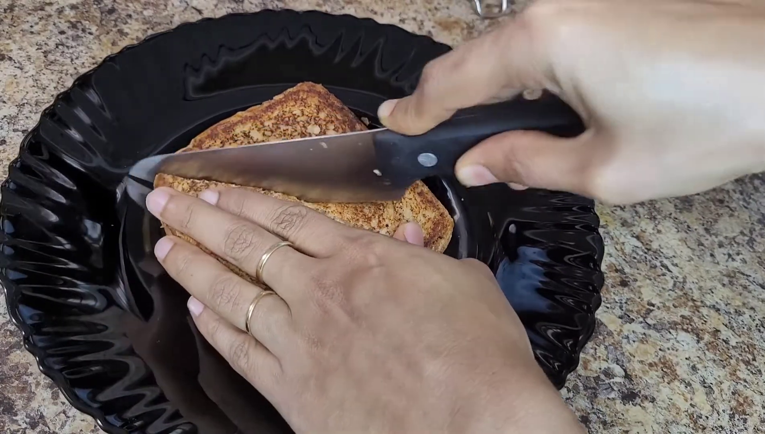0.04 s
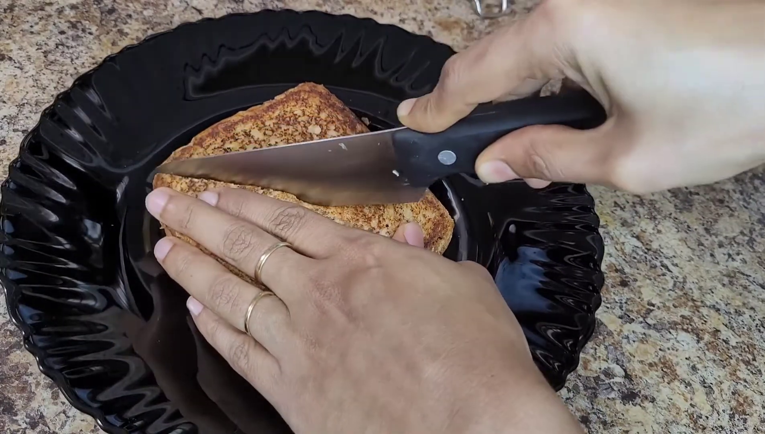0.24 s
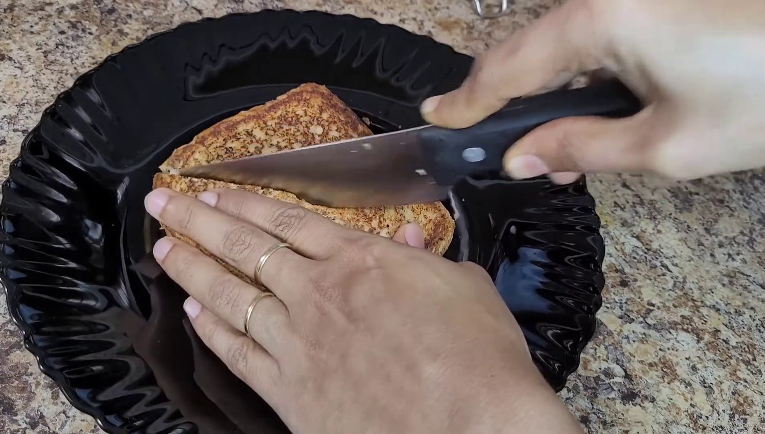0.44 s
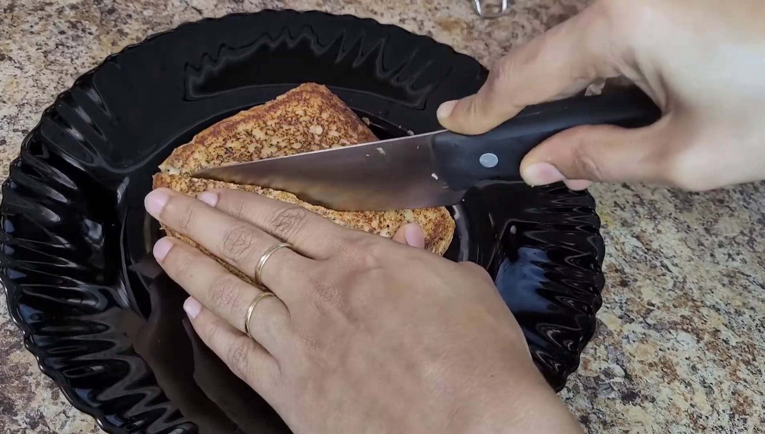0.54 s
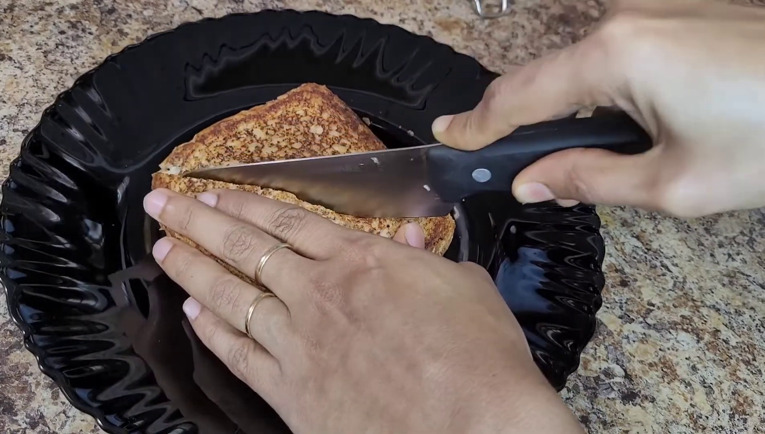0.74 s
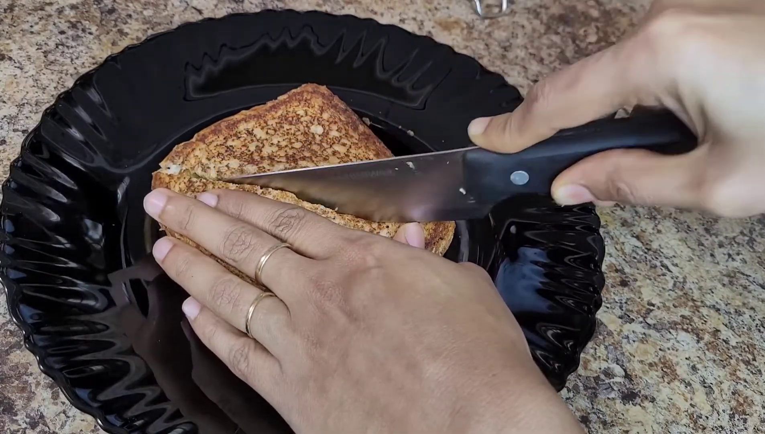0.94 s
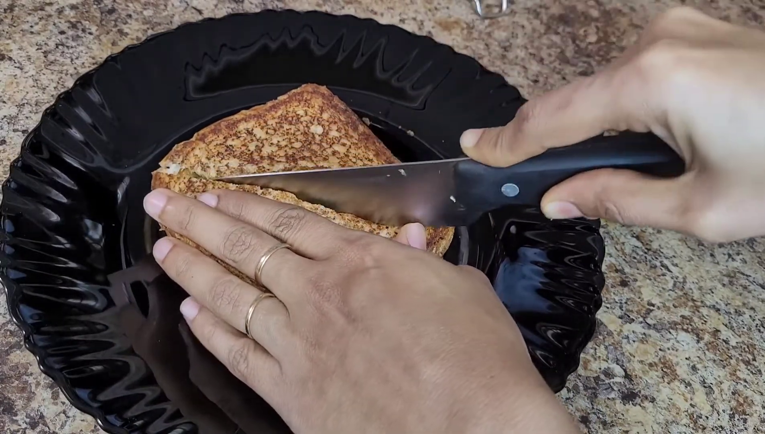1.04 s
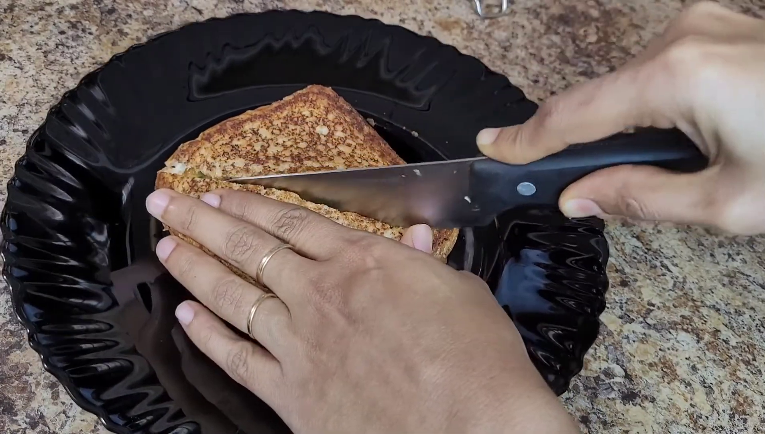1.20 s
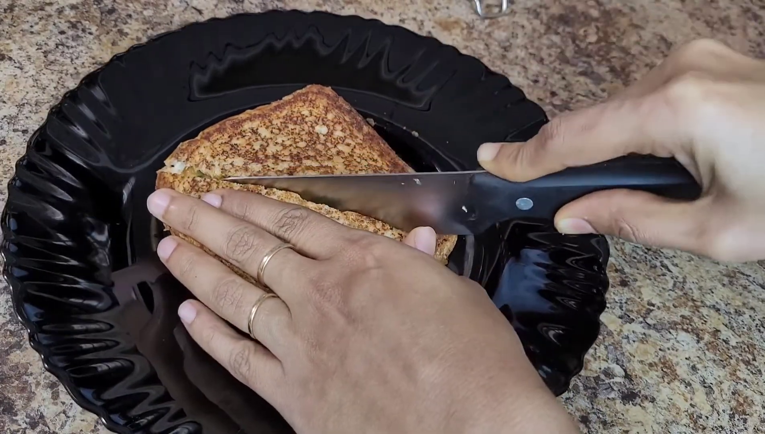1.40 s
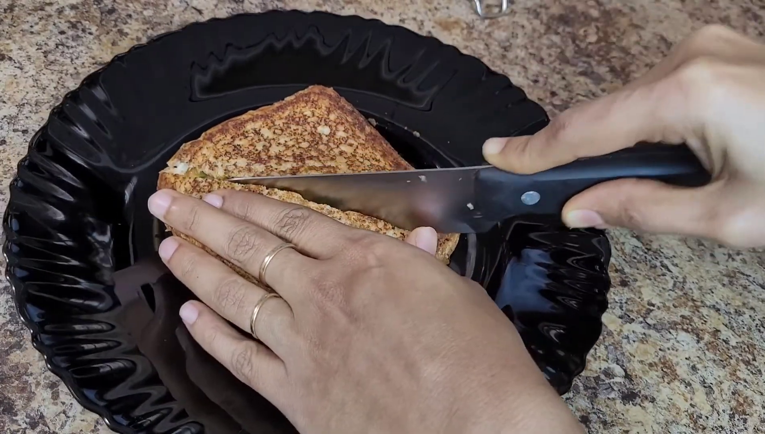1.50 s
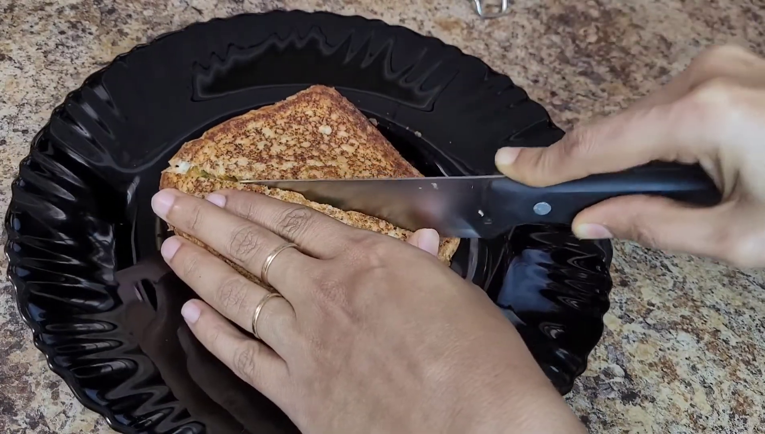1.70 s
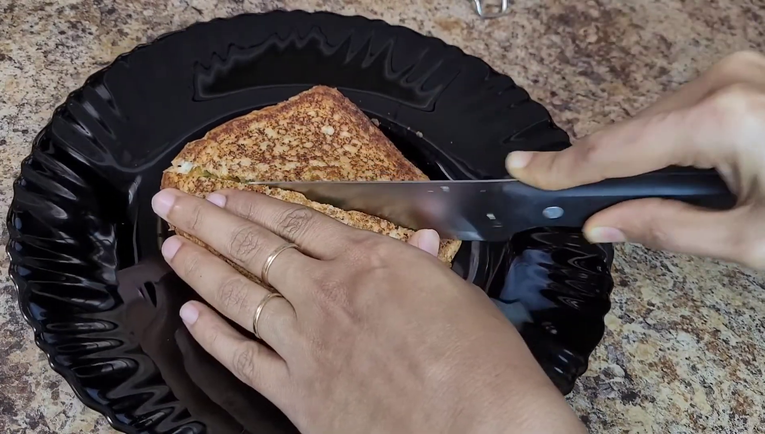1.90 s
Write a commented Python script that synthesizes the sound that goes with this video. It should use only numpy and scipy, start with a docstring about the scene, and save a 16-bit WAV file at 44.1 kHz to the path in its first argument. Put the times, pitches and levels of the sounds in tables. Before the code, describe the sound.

Knife cutting crusty toast: one sharp plate clack, then soft dry scrapes and a crunchy finish

```python
"""In a small kitchen, a knife breaks through a toasted sandwich and knocks once on the plate,
which rings briefly on the stone counter: decaying sine modes and beating bands of noise.
The blade is then drawn slowly through the crust: grains over noise rasp, short bursts snap and tick,
and the plate takes soft bumps of low noise. A faint wavering hum of sines lies under it all,
with low thuds swelling at 52.6 Hz."""
import sys
import numpy as np
from scipy import signal
from scipy.io import wavfile
from scipy.ndimage import uniform_filter1d

SR = 44100
rng = np.random.default_rng(int(sys.argv[2]) if len(sys.argv) > 2 else 0)


def store_wav(level_fs):
    """Save 16-bit WAV to argv[1]."""
    pcm = np.round(np.clip(np.atleast_2d(level_fs), -1, 1) * 32767)
    wavfile.write(sys.argv[1], SR, pcm.T.astype(np.int16))


N = 85995
TIME = np.arange(N) / SR   # [s]


def from_db(db):
    """Logarithmic level: decibels to amplitude gain."""
    return 10 ** (np.asarray(db) / 20)


def rms_one(x):
    """Normalisation: scale to rms 1."""
    return x / np.sqrt(np.mean(x ** 2) + 1e-20)


def at_hz(points, hz):
    """Spectral interpolation: read a table along logarithmic frequency."""
    table_hz, values = np.transpose(points)
    return np.interp(np.log(hz), np.log(table_hz), values)


def in_time(rows):
    """Envelope interpolation: each column of a curve at every sample."""
    times, *columns = np.transpose(rows)
    return [np.interp(TIME, times, column) for column in columns]


def filtered(order, hz, kind, x):
    """Linear filtering: a Butterworth filter."""
    sos = signal.butter(order, hz, kind, fs=SR, output="sos")
    return signal.sosfilt(sos, x + 1e-18)   # the tiny offset keeps silence from slowing the filter


def panned(pan_db):
    """Interchannel level difference: left and right gains; positive is louder on the left."""
    return from_db(np.array([[.5], [-.5]]) * pan_db)


# Pan of the crunch and clatter: (frequency [Hz], left minus right [dB])
CRUNCH_PAN = [(500, 2.5), (2500, -1.5), (5500, -3), (9000, 5)]


def panned_at(hz):
    """Frequency-dependent level difference between left and right."""
    return panned(at_hz(CRUNCH_PAN, hz))


# Likeness of left and right: (frequency [Hz], correlation [0 to 1])
LIKENESS = [(60, 0.71), (170, .93), (350, 0.32), (700, 0.62), (1500, 0), (4000, 0.047), (10000, 0.021)]


def likeness(hz):
    """Interchannel correlation at a frequency."""
    return at_hz(LIKENESS, hz)


def widened(mid, side, hz):
    """Mid-side synthesis: independent mid and side give the correlation of this frequency."""
    alike = likeness(hz)
    return np.sqrt(1 + alike) * mid + np.sqrt(1 - alike) * side * [[1], [-1]]


def decay(start, t60):
    """Exponential damping: sudden start, then a fall of 60 dB every t60."""
    return (TIME >= start) * from_db(-60 * np.clip((TIME - start) / t60, 0, 4))


def ring(start, hz, t60):
    """Free vibration: one damped sine mode of height 1."""
    return decay(start, t60) * np.sin(2 * np.pi * hz * (TIME - start))


EDGES = 22 * 2 ** (np.arange(29) / 3)   # third-octave band edges [Hz]


def bands(sources, spectrum):
    """Subband synthesis: coloured stereo third-octaves as (Hz, sound), together rms 1."""
    out = []
    for k, (low, high) in enumerate(zip(EDGES, EDGES[1:])):
        # neighbouring bands use alternate sources
        mid, side = filtered(2, [low, high], "band", sources[k % 2])
        hz = np.sqrt(low * high)
        bass_fall = min(1, hz / spectrum[0][0]) ** 4   # below the first table frequency
        gain = from_db(at_hz(spectrum, hz)) * bass_fall
        out.append((hz, gain * widened(mid, side, hz)))
    size = np.std(sum(band for _, band in out))
    return [(hz, band / size) for hz, band in out]


def noise(spectrum):
    """Random excitation: coloured stereo noise of rms 1."""
    return sum(band for _, band in bands(rng.standard_normal((2, 2, N)), spectrum))


def cluster(low, high):
    """High modal density: band noise stands for many close modes beating at an even level; rms 1."""
    mid, side = filtered(4, [low, high], "band", rng.standard_normal((2, N)))
    x = widened(mid, side, low)
    running_power = uniform_filter1d(np.mean(x ** 2, axis=0), size=700)
    return x / np.sqrt(running_power + 1e-12)


def burst(start, hz, t60, span):
    """Band-limited excitation: a dying spray of noise around one pitch; starts near rms 1."""
    low, high = hz / span, min(hz * span, 16000)
    bandwidth_gain = np.sqrt(SR / 2 / (high - low))
    spray = decay(start, t60) * rng.standard_normal((2, N))
    return bandwidth_gain * filtered(3, [low, high], "band", spray)


KNOCK_S, KNOCK_LOW_HZ = .1173, 180   # the blade meets the plate; low cut of the knock
PLATE_DB, CLATTER_DB, CRACK_DB, CRACK_T60_S = -1.5, -0.5, 0, 0.018
# The contact itself: (delay [s], pitch [Hz], level [dB], t60 [s], pan [dB], right-channel lag [s])
CONTACT = [(0.0032, 690, -9.5, 0.01, -1, 0.0004), (0.0055, 5300, -11, .007, 1.5, 0.00012),
           (0, 2000, -23, .006, -4, 0.00015), (0.0056, 8200, -25, 0.02, 1.5, 0.000034)]
# Modes of plate and blade: (frequency [Hz], level before PLATE_DB [dB], t60 [s], pan [dB])
PLATE = [(248, -31, 0.24, -1), (346.4, -38, 0.23, -6.5), (381, -39.5, 0.28, -2.5), (428.4, -29, .16, -4.5),
         (543, -29, .15, -1), (638.5, -29.5, .15, 1), (693.8, -27.5, 0.2, -3), (723, -39.5, 0.43, 3.5),
         (775, -34, .15, 5), (846.5, -35, 0.25, 3), (1104, -37, 0.17, -2.5), (1260, -31, 0.14, -12),
         (1268, -37, 0.24, 3), (1620, -44, 0.38, -6), (2176, -29, .2, 5.5), (2220, -45, 0.41, 4.5),
         (2354, -35.5, .17, -0.5), (2845, -36, .27, -19.5), (3335, -44.5, 0.16, 5.5),
         (3640, -39, 0.19, 2.5), (4715, -36, .17, -8.5), (5357, -35.5, .14, -14), (6000, -41.5, 0.14, 6),
         (6605, -48.5, 0.17, -1.5), (7264, -39, 0.15, -7), (8290, -37, 0.14, -4.5),
         (9076, -38.5, 0.13, 4.5), (10251, -47.5, 0.13, 12)]
# Clusters of close modes in plate and counter:
# (low edge [Hz], high edge [Hz], level before the clatter and crack gains [dB], t60 [s])
CLATTER = [(145, 400, -37.5, .24), (330, 600, -29, 0.21), (611, 920, -31, 0.19), (920, 1310, -31.5, 0.21),
           (1240, 2200, -41.5, .19), (1988, 2380, -29.5, .18), (3070, 3750, -34.5, .18),
           (4000, 4500, -32, .15), (4500, 4850, -32, 0.21), (5224, 5500, -34.5, 0.12),
           (5492, 6100, -39.5, 0.098), (6524, 8200, -40.5, .15), (8600, 10700, -40.5, 0.2)]


def knock():
    """Modal synthesis of an impact: hard contact, ringing modes and a dense, quickly dying clatter."""
    out = np.zeros((2, N))
    for delay, hz, db, t60, pan_db, lag in CONTACT:
        pair = [ring(KNOCK_S + delay + d, hz, t60) for d in (0, lag)]
        out += from_db(db) * panned(pan_db) * pair
    for hz, db, t60, pan_db in PLATE:
        arrival = rng.uniform(0, 1) / hz   # within one period
        lag = rng.uniform(0.15, 0.27) * (1 - likeness(hz)) / hz
        pair = [ring(KNOCK_S + arrival + d, hz, t60) for d in (0, lag)]
        out += from_db(db + PLATE_DB) * panned(pan_db) * pair
    for low, high, db, t60 in CLATTER:
        slow_fall = from_db(CLATTER_DB) * decay(KNOCK_S, t60)
        crack = from_db(CRACK_DB) * decay(KNOCK_S, CRACK_T60_S)
        out += from_db(db) * (slow_fall + crack) * cluster(low, high) * panned_at(low)
    return filtered(3, KNOCK_LOW_HZ, "high", out)


GRAINS_PER_S, GRAIN_SPREAD_DB = 1500, 3.5


def crunch(spectrum, grain_db, rasp_db):
    """Random fracture: tiny clicks of very uneven size over the smooth rasp of the blade."""
    sizes = from_db(GRAIN_SPREAD_DB * np.minimum(rng.exponential(1, N), 4))
    happens = rng.random(N) < GRAINS_PER_S / SR
    clicks = sizes * happens * rng.standard_normal((2, 2, N))
    rasp = rng.standard_normal((2, 2, N))
    source = from_db(grain_db) * rms_one(clicks) + from_db(rasp_db) * rasp
    return np.std(source) * sum(band * panned_at(hz) for hz, band in bands(source, spectrum))


CRISP_DB, CRISP_RASP_DB = -2.5, -4     # grains and rasp of the treble
CRUMB_DB, CRUMB_RASP_DB = -2.5, -5.5   # grains and rasp of the middle
# Pressure of the cut, as crunch: (time [s], treble gain [dB], middle gain [dB])
CUT_IN = [(0.0, -74.5, -77.5), (0.008, -60, -73.5), (0.046, -74.5, -81), (0.068, -59, -67.5),
          (0.108, -54.5, -54), (0.112, -55, -49)]
DRAW = [(0.26, -65, -64.5), (0.302, -62.5, -62), (0.41, -79, -100), (0.43, -65.5, -82), (0.572, -76, -84),
        (0.624, -63.5, -70.5), (0.674, -68.5, -75), (0.706, -76.5, -82), (0.798, -66.5, -77),
        (0.87, -71, -83.5), (0.89, -65, -74.5), (0.946, -79, -96), (0.986, -63, -68), (1.054, -67, -78.5),
        (1.294, -66.5, -79.5), (1.34, -81.5, -91.5), (1.432, -72, -73.5), (1.44, -87, -86)]
LAST_CRUST = [(1.44, -80, -98), (1.454, -63.5, -81.5), (1.54, -57.5, -59), (1.552, -56.5, -56.5),
              (1.65, -79, -97.5), (1.678, -58.5, -64), (1.69, -71, -70), (1.722, -63.5, -67),
              (1.806, -73.5, -71.5), (1.828, -57.5, -68.5), (1.872, -64.5, -68.5), (1.89, -55.5, -56.5),
              (1.95, -63, -67)]
# Colours of the treble and middle crunch: (frequency [Hz], relative density [dB per Hz])
CRISP = [(2060, -37.5), (3500, -6.5), (4060, -5.5), (4410, -1.5), (5480, -0.5), (9270, -3.5), (10800, -1.5),
         (12000, -21.5), (15600, -54), (22000, -120)]
CRUMB = [(400, -17), (900, -11.5), (1600, -7), (2500, -1), (3500, -5), (5000, -16), (8000, -41)]


def cutting():
    """Amplitude modulation: the crunch follows the pressure on the knife."""
    treble_db, middle_db = in_time(list(CUT_IN) + list(DRAW) + list(LAST_CRUST))
    treble = from_db(treble_db) * crunch(CRISP, CRISP_DB, CRISP_RASP_DB)
    middle = from_db(middle_db) * crunch(CRUMB, CRUMB_DB, CRUMB_RASP_DB)
    return treble + middle


SNAP_DB, SNAP_CYCLES = -0.5, 5   # the ring falls 60 dB in this many cycles
SPLINTER_DB, SPLINTER_T60_S = -9, .009
SNAP_SPAN = 1.8   # splinters reach this ratio above and below the pitch, at most to 16 kHz
# Single pieces of crust: (time [s], level before ring and splinter gains [dB], pitch [Hz], pan [dB])
SNAPS = [(0.0084, -38, 7500, -4.5), (0.0655, -38.5, 6700, -4.5), (0.0724, -33, 6900, 2),
         (0.8055, -46.5, 7060, 3), (0.8916, -40.5, 9100, 5), (1.058, -46.5, 6220, 1.0),
         (1.0917, -44.5, 5250, 4), (1.2181, -43.5, 4670, -4.5), (1.2974, -45, 8870, -5),
         (1.4562, -40.5, 7140, 5), (1.4743, -50.5, 9040, -1), (1.4891, -37.5, 8930, 7.5),
         (1.5264, -60, 9410, -0.5), (1.5496, -43.5, 4000, -12), (1.5579, -45, 2740, 19),
         (1.5613, -44, 2160, -1), (1.5837, -45.5, 2720, 4), (1.6755, -58, 10000, -16),
         (1.7142, -49.5, 2400, -8), (1.7641, -42.5, 4890, -3), (1.8094, -46.5, 9010, 0.5),
         (1.8262, -50, 8810, 6), (1.8295, -43, 2710, -3), (1.8425, -60, 8490, 12),
         (1.8804, -48.5, 10400, -7), (1.8905, -44, 8500, -17), (1.8964, -37, 9660, -9),
         (1.8995, -49, 2330, 7), (1.9335, -35, 9050, 2)]


def snaps():
    """Brittle fracture: each snap is a ring of a few cycles with a short spray of splinters."""
    out = np.zeros((2, N))
    for s, db, hz, pan_db in SNAPS:
        delays = rng.uniform(0, 0.27, 2) / hz   # left and right differ by part of a period
        ping = np.array([ring(s + d, hz, SNAP_CYCLES / hz) for d in delays])
        splinters = burst(s, hz, SPLINTER_T60_S, SNAP_SPAN)
        snap = from_db(SNAP_DB) * ping + from_db(SPLINTER_DB) * splinters
        out += from_db(db) * panned(pan_db) * snap
    return filtered(2, 1800, "high", out)


# The blade catches and slips: (time [s], pitch [Hz], starting level [dB], t60 [s])
TICKS = [(0.425, 5600, -53.5, 0.015), (0.4339, 5330, -50, 0.016), (0.467, 6100, -52, 0.017),
         (.978, 2520, -55.5, 0.052), (1.104, 530, -53, 0.027), (1.266, 7900, -54.5, 0.014),
         (1.55, 3400, -38, .007), (1.675, 8700, -44.5, 0.016), (1.891, 8000, -47, .02)]


def ticks():
    """Stick-slip: the blade slips and catches in short bursts nearly an octave wide."""
    return sum(from_db(db) * burst(s, hz, t60, span=1.35) for s, hz, db, t60 in TICKS)


RUB_DB, BUMP_RISE_S = -0.5, 0.0037   # the rise is a time constant
BUMP_RING_DB, BUMP_RING_HZ, BUMP_RING_T60_S = -4, 245.5, 0.28
# Rubbing on the plate, as the blade sinks in and afterwards: (time [s], level before RUB_DB [dB])
RUB_IN = [(0.0, -59), (0.032, -74.5), (0.044, -84), (0.05, -74.5), (0.106, -58)]
RUB = [(0.24, -60), (0.262, -74), (0.286, -53), (0.34, -70), (0.596, -76.5), (0.62, -63), (0.74, -73.5),
       (0.84, -65.5), (0.872, -73.5), (1.124, -71), (1.14, -59.5), (1.286, -80.5), (1.526, -77.5),
       (1.572, -64.5), (1.644, -79.5), (1.864, -72), (1.896, -57.5), (1.95, -62.5)]
# Colours of the rubbing and of the bumps: (frequency [Hz], relative level [dB])
RUB_COLOUR = [(120, -12.5), (190, -9.5), (260, 4.5), (340, -2), (450, -12), (800, -15), (1200, -29.5),
              (4000, -54)]
BUMP = [(60, -4), (140, 7), (250, -1.5), (400, -7.5), (800, -18), (1500, -73)]
# Soft bumps of the plate: (time [s], level of thud and ring before rise and ring gains [dB], thud t60 [s])
BUMPS = [(.275, -54, 0.26), (0.61, -54, 0.22), (0.786, -57, 0.14), (0.821, -57, 0.22), (1.139, -52.5, 0.21),
         (1.547, -53.5, 0.074), (1.879, -51.5, 0.083)]


def plate_handling():
    """Soft excitation: rubbing and bumps pass through the bread and stir a low mode of the plate."""
    rub_db, = in_time(list(RUB_IN) + list(RUB))
    out = from_db(rub_db + RUB_DB) * noise(RUB_COLOUR)
    thud = noise(BUMP)
    for s, db, t60 in BUMPS:
        rise = 1 - np.exp(-np.maximum(TIME - s, 0) / BUMP_RISE_S)
        mode = from_db(BUMP_RING_DB) * ring(s, BUMP_RING_HZ, BUMP_RING_T60_S)
        out += from_db(db) * rise * (thud * decay(s, t60) + mode)
    return out


ROOM_DB, ROOM_T60_S = -5.5, 0.36
# Colour of the reverberation: (frequency [Hz], relative level [dB])
ROOM = [(200, 0), (3000, -2.6), (11000, 1)]


def kitchen(x):
    """Diffuse reverberation: convolution with a short decaying noise tail."""
    tail = noise(ROOM) * decay(0.0056, ROOM_T60_S)   # starts after a short gap [s]
    tail = tail / np.sqrt(np.sum(tail ** 2))
    return from_db(ROOM_DB) * signal.fftconvolve(x, tail, axes=1)[:, :N]


FLOOR_DB, HUM_WAVER_DB, LOW_THUD_HZ = -69, 1.5, 52.6
# Low thuds swell and die over a faint tone of the same pitch: (time [s], rms level before panning [dB])
LOW_THUDS = [(0, -61), (.1, -62.5), (.16, -51.5), (.22, -72), (.31, -55), (.37, -69.5), (.5, -66.5),
             (.61, -61.5), (.68, -64.5), (.82, -65), (.9, -58.5), (.97, -67), (1.2, -65.5), (1.48, -65),
             (1.55, -57), (1.65, -64.5), (1.95, -70)]
# Hum lines: (frequency [Hz], rms level before wavering [dB])
HUM = [(120, -66), (241, -79)]
# Colour of the room air: (frequency [Hz], relative level [dB])
FLOOR = [(30, -8), (50, 3), (85, -2), (200, -11.5), (400, -16.5), (1000, -34.5), (4000, -26.5),
         (11000, -28)]


def background():
    """Noise and modulated pure tones: the air of the room, low thuds and a wavering hum."""
    air = from_db(FLOOR_DB) * noise(FLOOR)
    thud_db, = in_time(LOW_THUDS)
    low_thuds = np.sqrt(2) * from_db(thud_db) * np.sin(2 * np.pi * LOW_THUD_HZ * TIME)
    out = air + low_thuds * panned(pan_db=-4.5)
    for hz, db in HUM:
        waver = np.interp(TIME, np.linspace(0, TIME[-1], 20), rng.standard_normal(20))
        tone = np.sin(2 * np.pi * (hz * TIME + rng.random()))
        out = out + np.sqrt(2) * from_db(db + HUM_WAVER_DB * waver) * tone
    return out


def scene():
    """Superposition: knock, cutting and handling over the background; the crust also reverberates."""
    crust = cutting() + snaps() + ticks()
    return knock() + crust + kitchen(crust) + plate_handling() + background()


TREBLE_EDGE_HZ, CUTOFF_HZ = 10660, 11900


def record(dry):
    """Low-pass filtering: the treble rolls off and the top is cut steeply."""
    soft = signal.sosfilt(signal.butter(8, TREBLE_EDGE_HZ, fs=SR, output="sos"), dry)
    steep = signal.ellip(10, .3, 70, CUTOFF_HZ, fs=SR, output="sos")   # ripple and stopband [dB]
    return signal.sosfilt(steep, soft)


dry = scene()
out = record(dry)
store_wav(out)
```